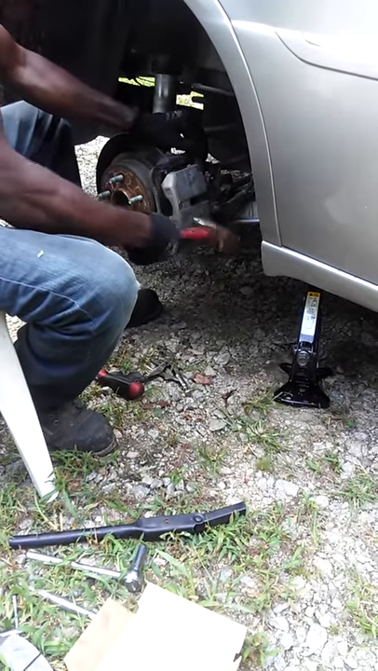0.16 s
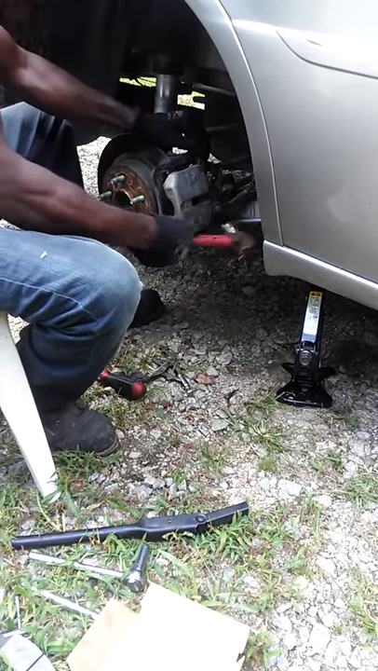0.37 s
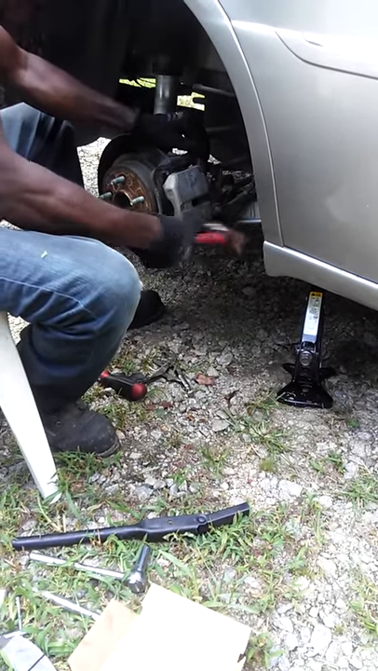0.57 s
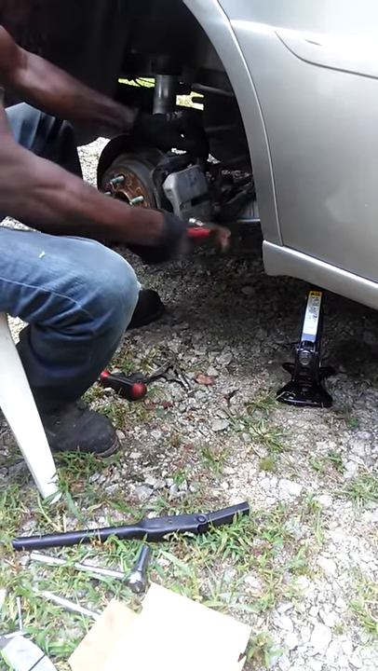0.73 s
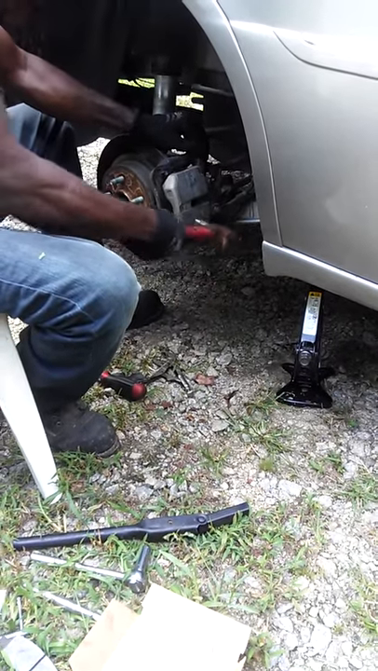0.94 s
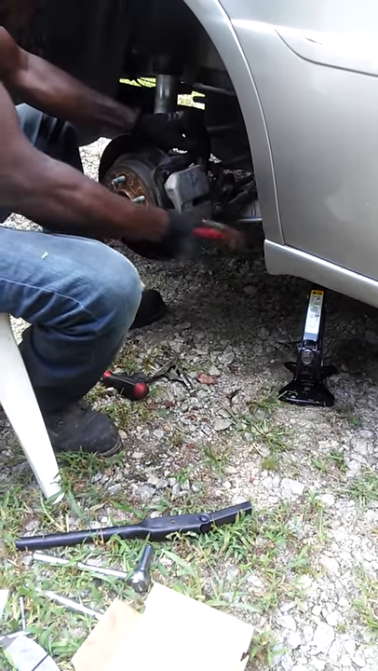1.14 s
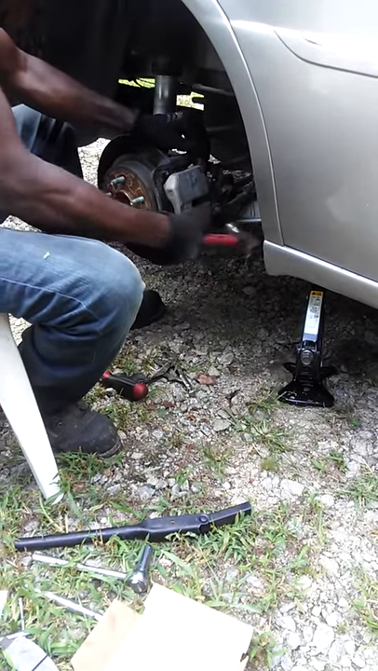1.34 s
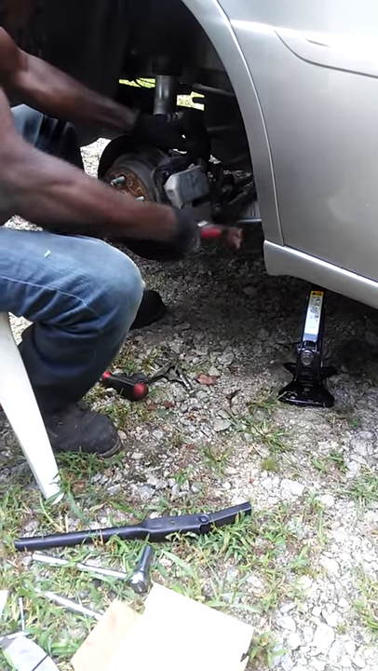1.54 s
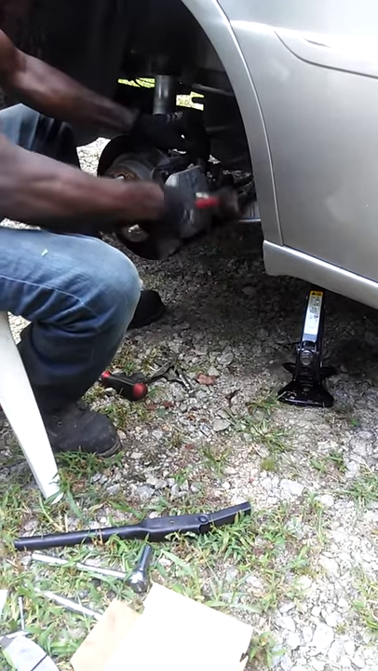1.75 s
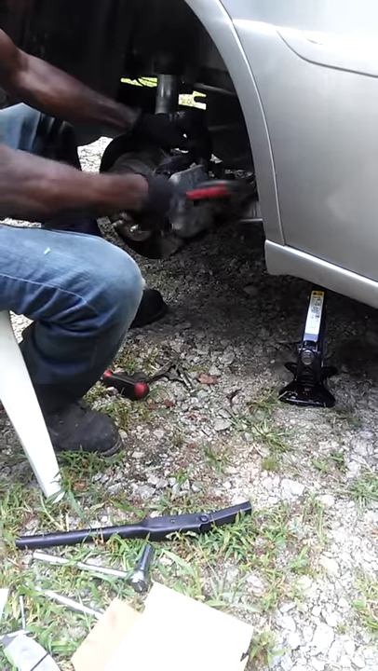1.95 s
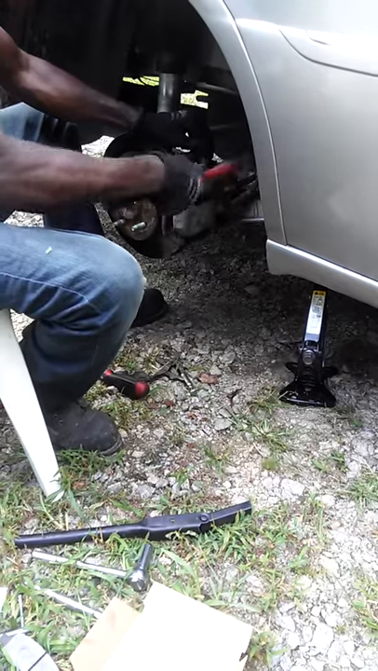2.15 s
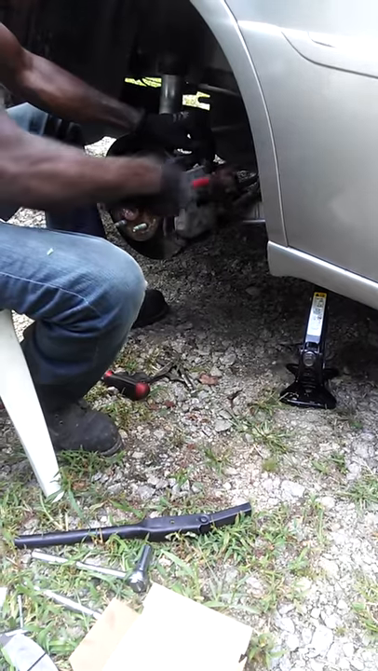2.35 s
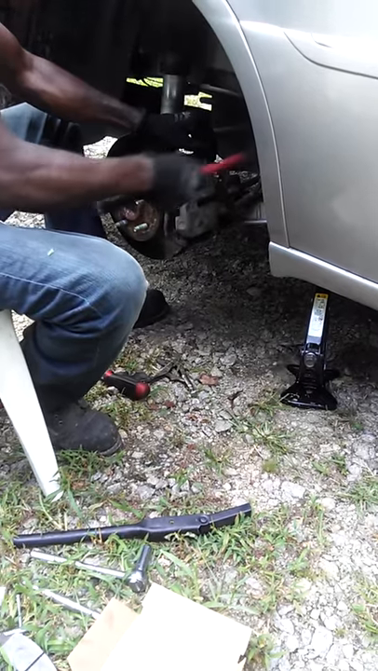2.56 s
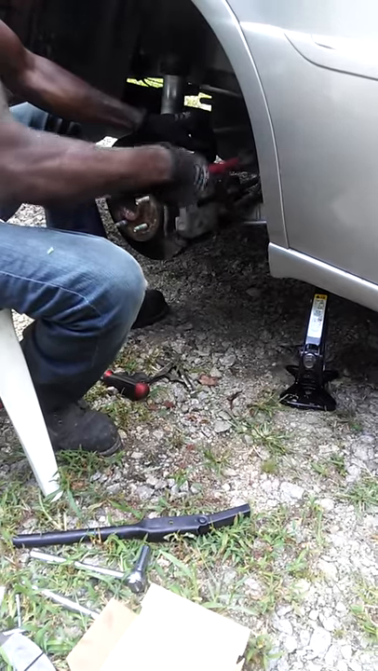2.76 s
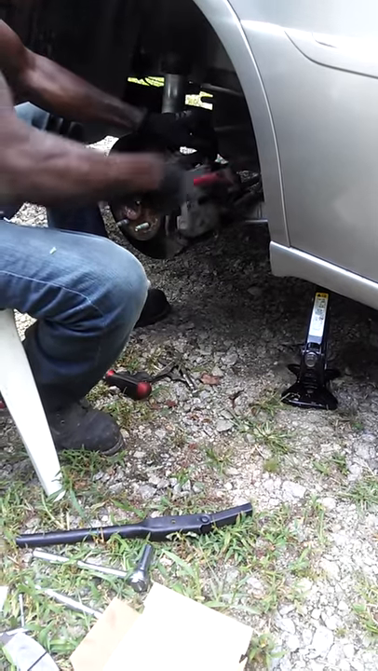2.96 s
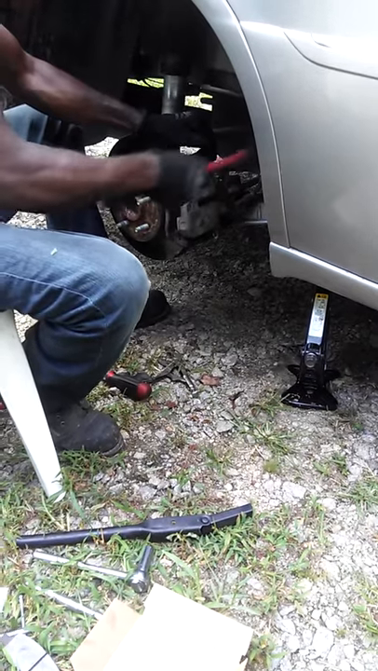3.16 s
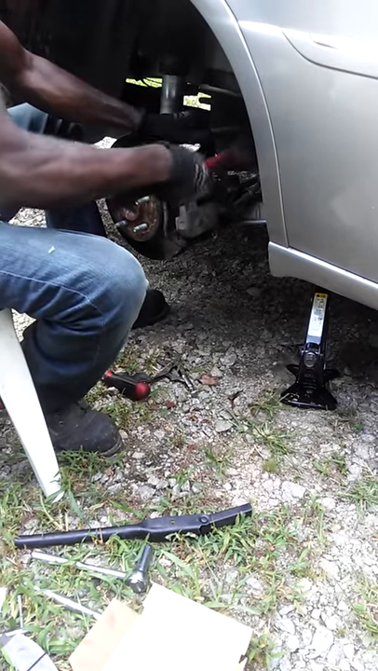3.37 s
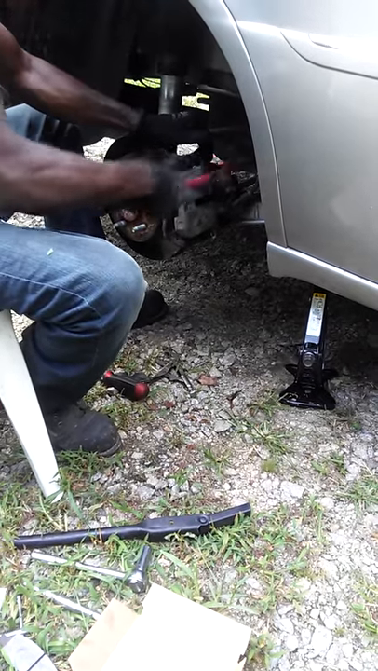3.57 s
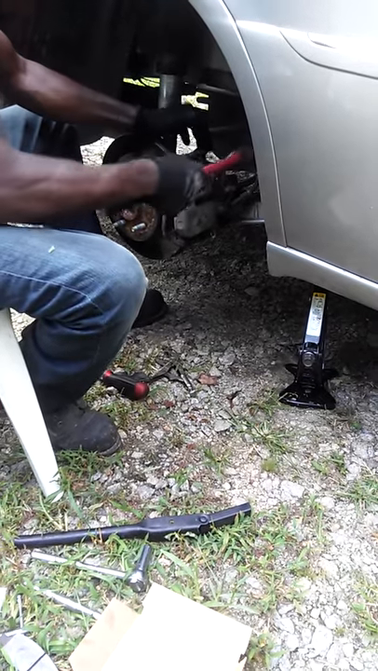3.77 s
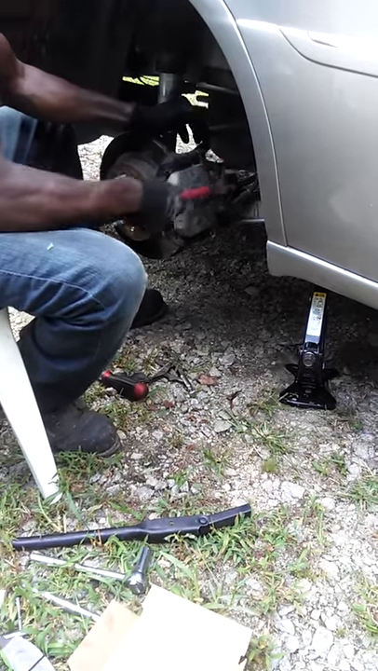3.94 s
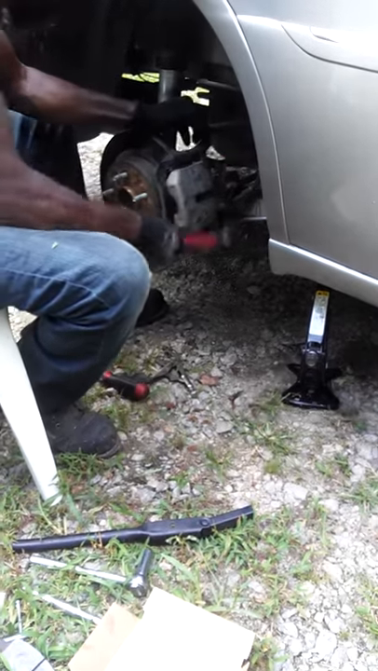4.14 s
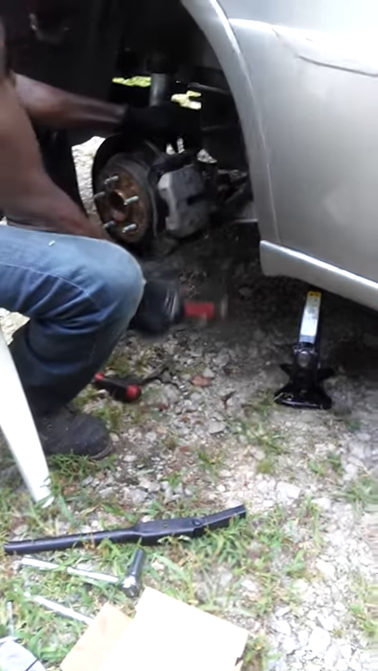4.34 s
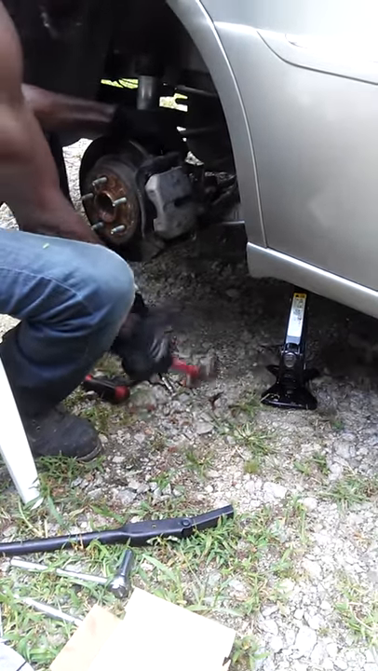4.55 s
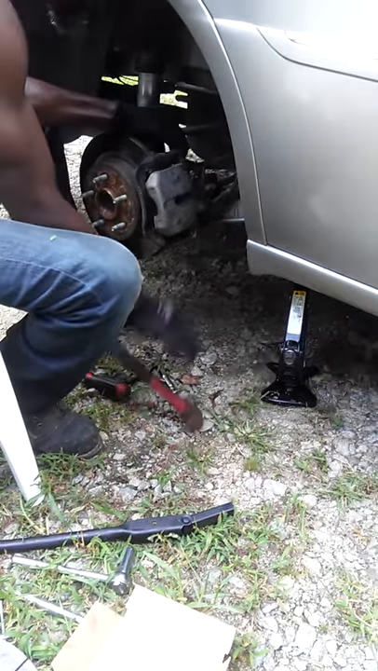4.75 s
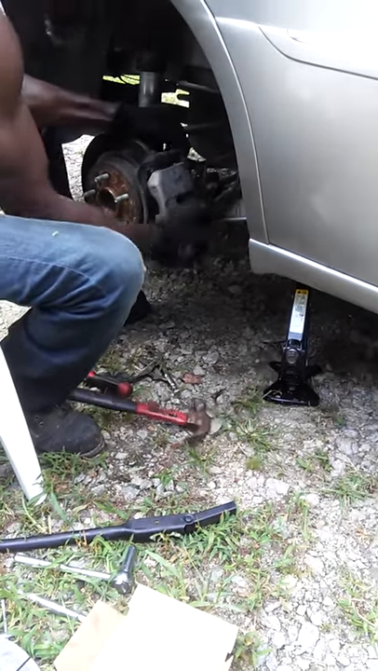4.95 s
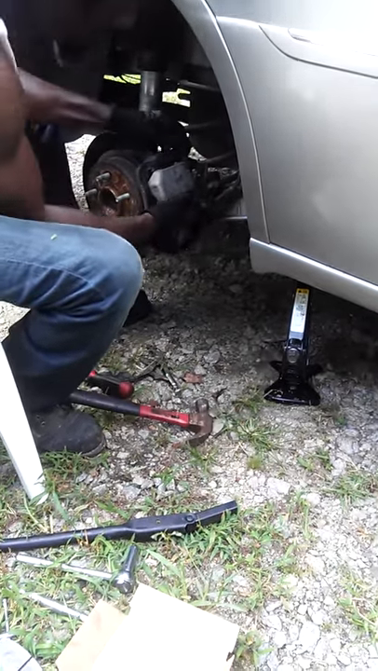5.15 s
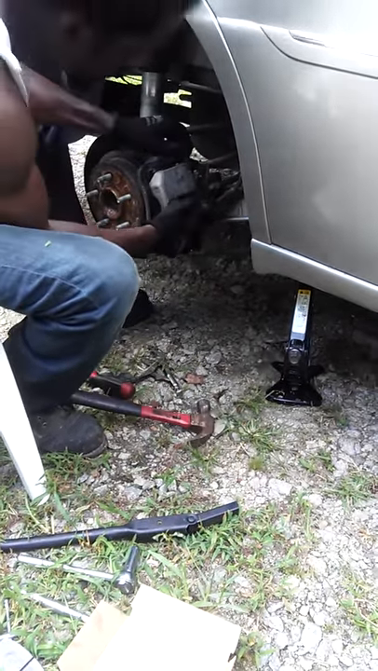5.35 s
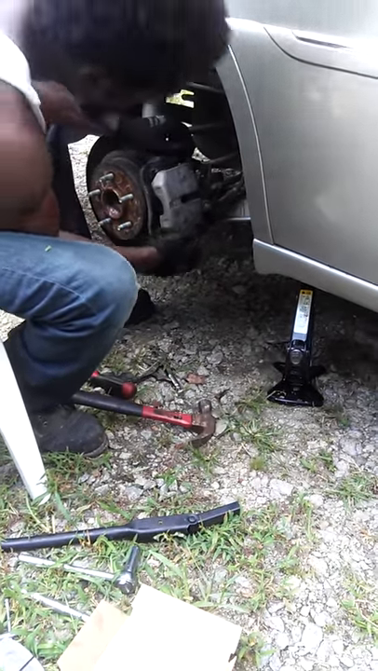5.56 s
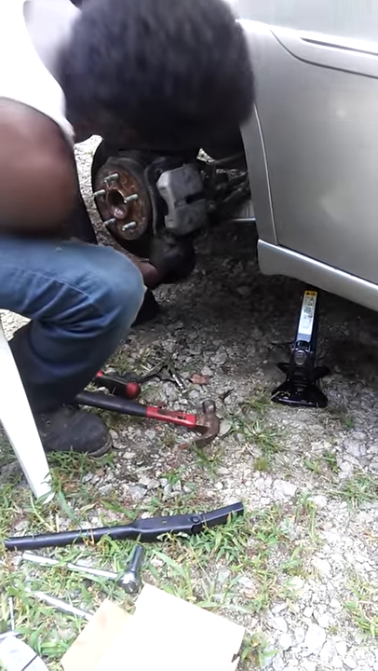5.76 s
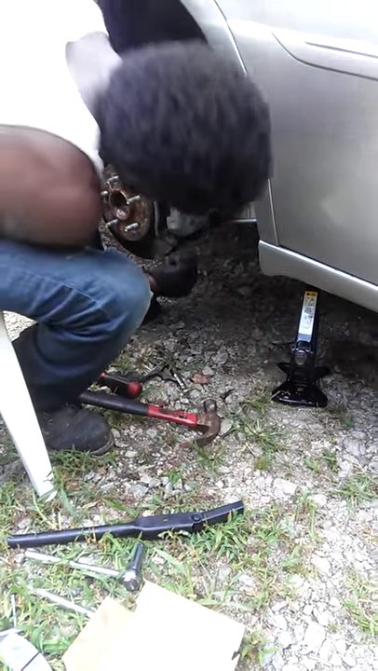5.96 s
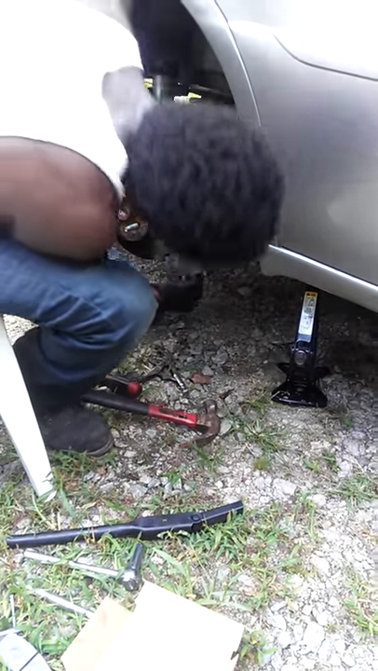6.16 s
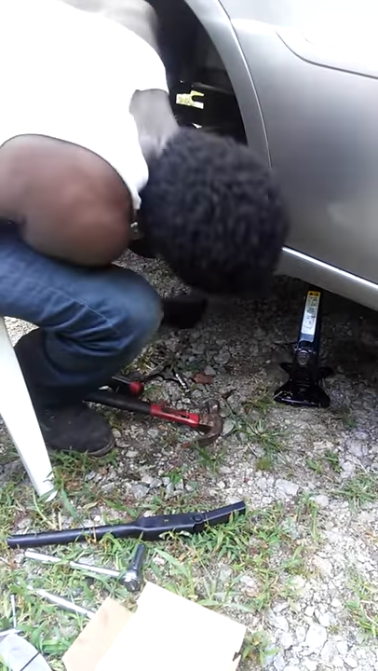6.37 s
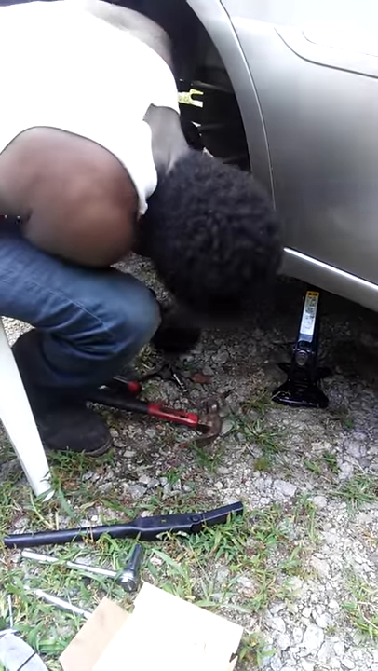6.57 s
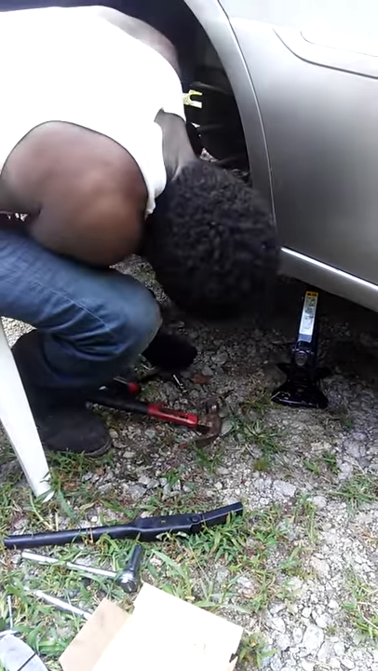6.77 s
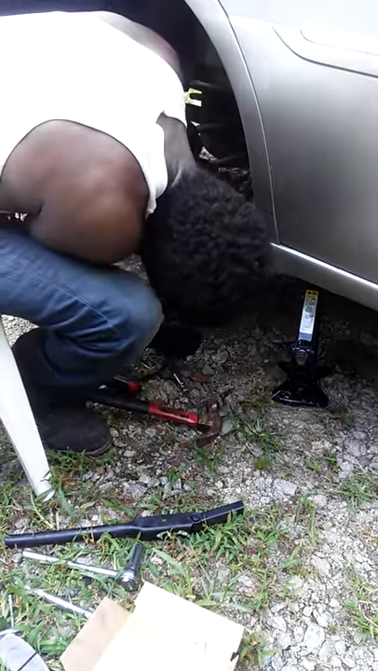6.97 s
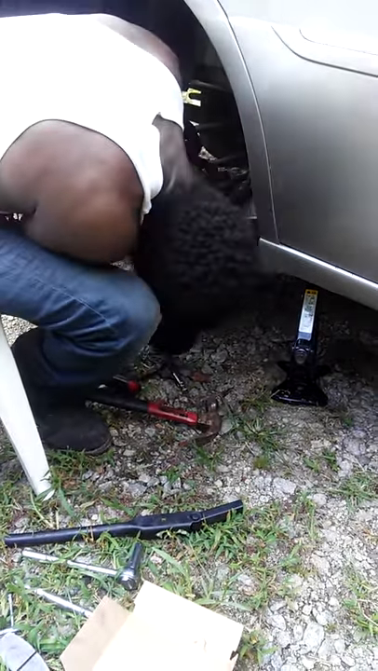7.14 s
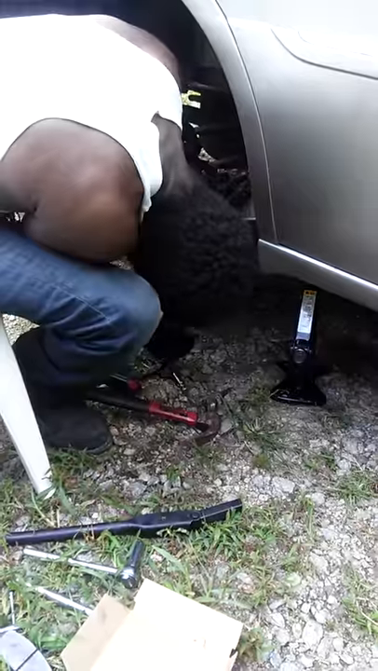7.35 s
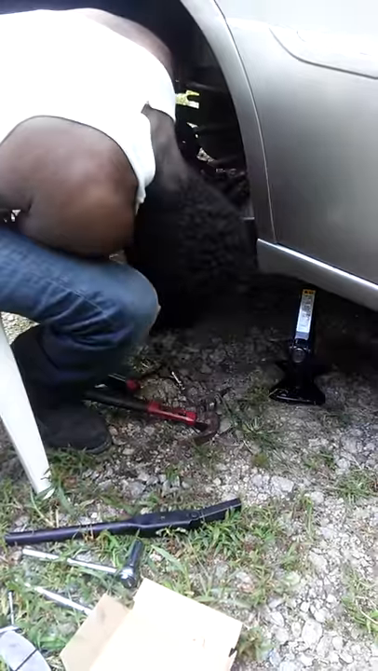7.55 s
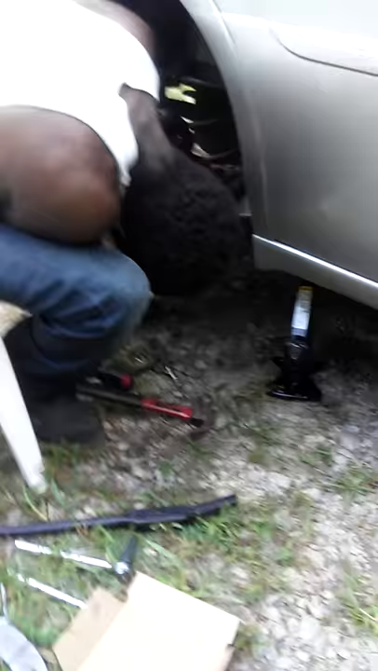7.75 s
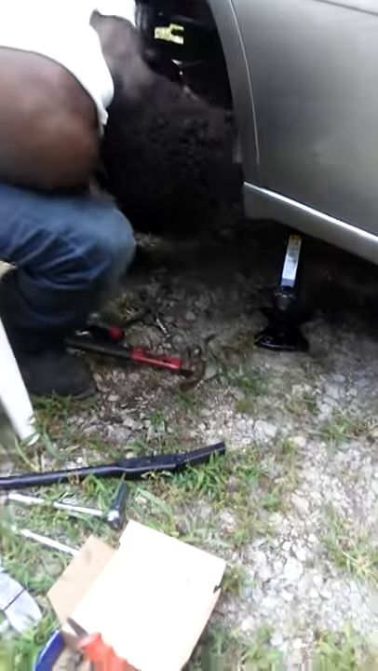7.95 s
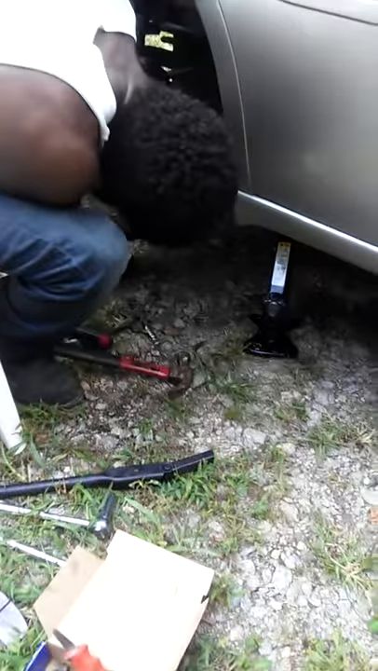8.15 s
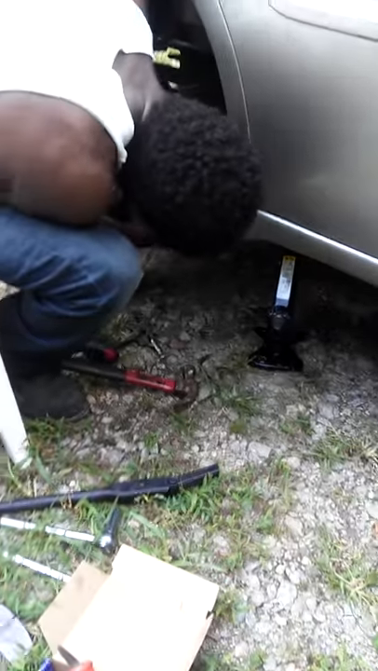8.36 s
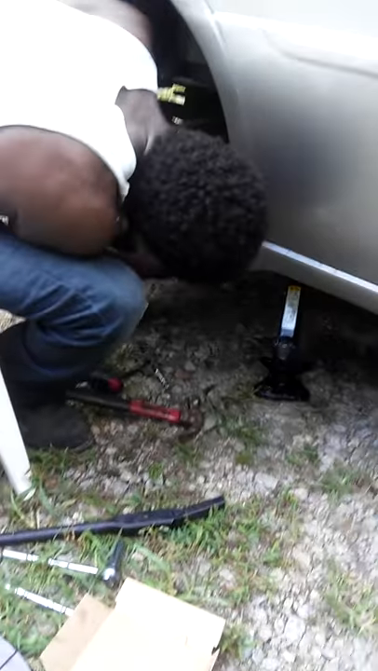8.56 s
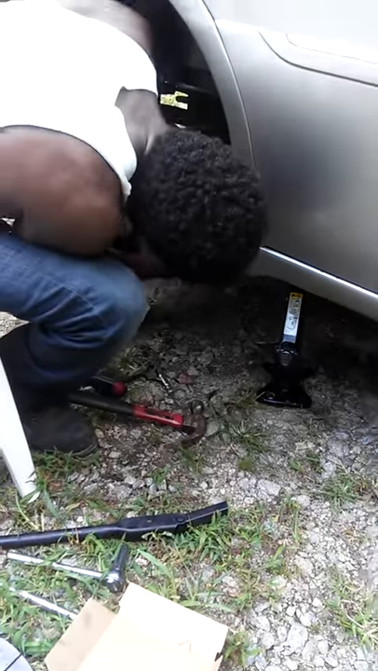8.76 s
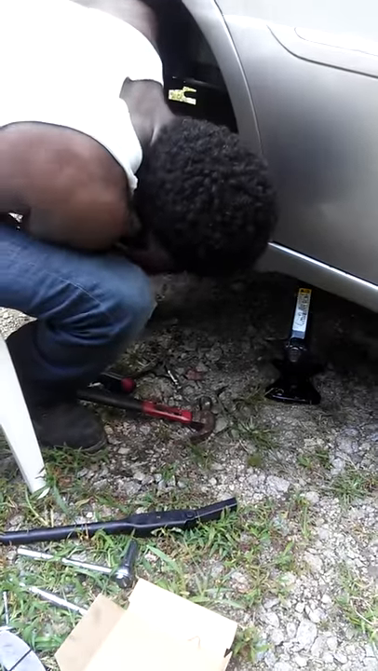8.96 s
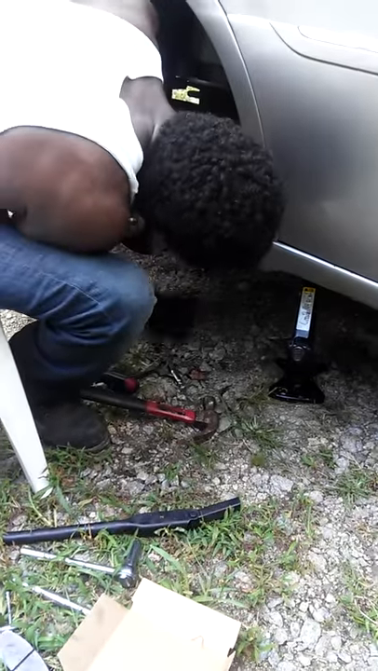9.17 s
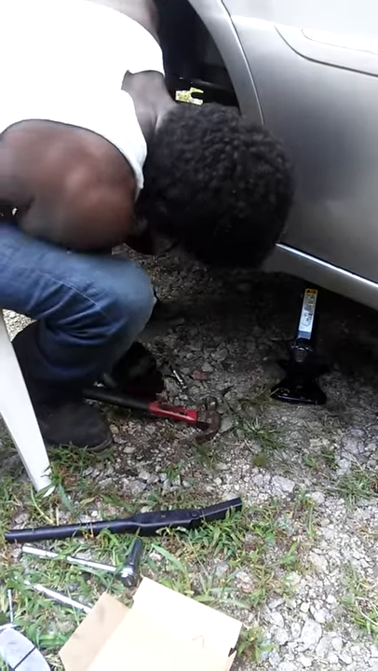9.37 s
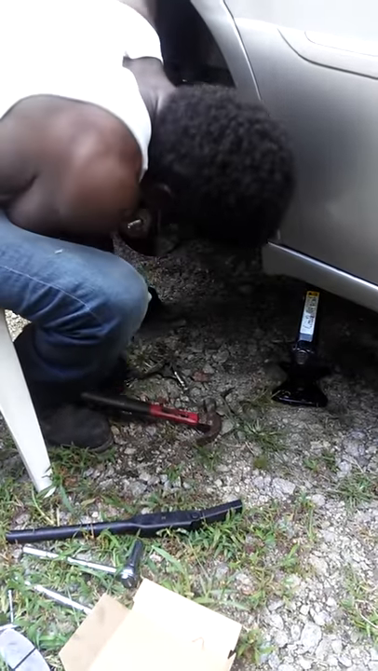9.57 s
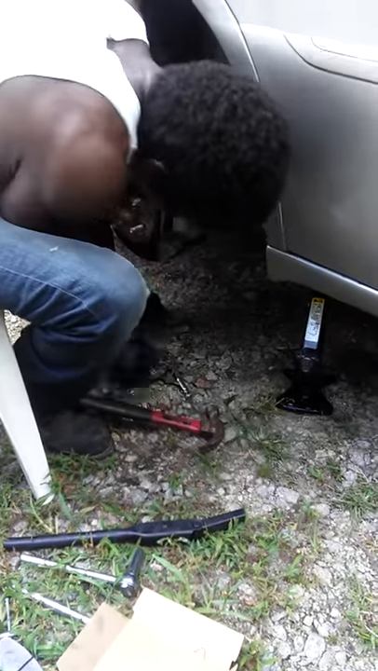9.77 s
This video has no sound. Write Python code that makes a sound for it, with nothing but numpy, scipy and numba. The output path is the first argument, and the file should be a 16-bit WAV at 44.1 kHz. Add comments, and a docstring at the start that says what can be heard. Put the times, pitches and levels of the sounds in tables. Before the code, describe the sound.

A close outdoor microphone, overloaded by loud blows. From 0 to 1.45 s a hammer hits a car's brake caliper roughly every quarter second: the tail of one blow, then six hard, dense clangs with a low thump, a whistling ring near 6 kHz and a short open-yard echo, the level pumping and clipping. After a half-second gap, six more blows from 2.03 to 3.56 s come every 0.3 s, brighter and higher, mostly with less thump. The ring fades by about 4.3 s. At 4.64 s the hammer drops on gravel, clacks again around 4.8 s, and slides and settles by 5.1 s with gritty crunching. Afterwards it is quiet: a buzzy cicada swells near 4.95, 6.1, 7.3, 8.55 and 9.8 s over a thin high insect chorus, soft air and low rumble. A soft wind puff comes at 8.87 s; small steel ticks, scrapes and faint gravel grinding follow from 9.1 to 9.8 s.

```python
"""Two runs of hammer blows clang on a car's brake caliper outdoors, then the hammer drops on gravel.
Each blow is a burst of dense damped modes plus ringing brake, claw and body shell modes and a yard echo.
Gravel grinds and small steel parts tick and scrape: filtered grains, noise bursts and short resonances.
A cicada swells over a far insect chorus, soft air, low rumble and faint chirps: shaped noise.
Loud sound turns a gain control down, which ducks the start of the echo; what still overloads is clipped."""
import sys
import numpy as np
from scipy import signal
from scipy.fft import rfft, irfft, next_fast_len
from scipy.io import wavfile
from scipy.ndimage import uniform_filter1d, minimum_filter1d, map_coordinates
from numba import njit

SR = 44100
rng = np.random.default_rng(int(sys.argv[2]) if len(sys.argv) > 2 else 0)


def wav_record(signal):
    """Record a signal, one row per channel, as 16-bit PCM in the file named by sys.argv[1]."""
    frames = np.transpose(np.atleast_2d(signal))
    bounded = np.clip(frames, -1, 1)
    # unit amplitude maps onto the largest positive 16-bit level
    quanta = np.round(bounded * 32767).astype(np.int16)
    wavfile.write(sys.argv[1], SR, quanta)


N = 432621

# yard echo colour: (frequency [Hz], relative level [dB])
YARD_COLOUR = [(60, -11.5), (400, -23), (900, -12), (2000, -1), (5000, 8.5), (8000, 8), (11000, 0),
               (16000, 3.5)]
# yard echo decay: (frequency [Hz], t60 [s])
YARD_DECAY = [(100, 0.98), (1000, 0.96), (4000, 0.51), (8000, 0.49), (14000, 0.53)]


def amp(db):
    """Decibels to gain."""
    return 10 ** (np.asarray(db) / 20)


def unit(x):
    """Scale to rms 1."""
    return x / np.sqrt(np.mean(x ** 2) + 1e-20)


def along(points, hz):
    """(Hz, value) points interpolated on a log frequency axis."""
    point_hz, values = np.transpose(points)
    return np.interp(np.log(hz + 1), np.log(point_hz + 1), values)


def clock(size=N):
    """Time of each sample in seconds."""
    return np.arange(size) / SR


def wobble(rate_hz):
    """Smooth random curve with rate_hz knots a second."""
    knots = rng.standard_normal(int(N * rate_hz / SR) + 4)
    return map_coordinates(knots, [clock() * rate_hz])


def coloured(x, spectrum):
    """x filtered by a (Hz, dB) spectrum, at rms 1."""
    padded = next_fast_len(len(x) + 4096)
    gain = amp(along(spectrum, np.fft.rfftfreq(padded, 1 / SR)))
    return unit(irfft(rfft(x, padded) * gain, padded)[:len(x)])


def noise(spectrum, size=N):
    """Coloured noise of rms 1."""
    return coloured(rng.standard_normal(size), spectrum)


def fade(t, t60_s):
    """Exponential decay: 60 dB down after t60_s."""
    return np.exp(-np.log(1000) * t / t60_s)


def dying(spectrum, t60s):
    """One second of dense random modes as noise whose bands fade at their own speeds."""
    hz, t, bands = signal.stft(noise(spectrum, size=SR), SR, nperseg=256)
    bands = bands * fade(t, along(t60s, hz)[:, None])
    return signal.istft(bands, SR, nperseg=256)[1][:SR]


def ring(hz, db, t60_s, drift_hz=4):
    """One second of a single decaying mode, db rms at the start; loose contacts make its pitch drift."""
    t = clock(size=SR)
    drift = drift_hz * np.interp(t, np.linspace(0, 1, 40), rng.standard_normal(40))
    cycles = np.cumsum(hz + drift) / SR + rng.random()
    return np.sqrt(2) * amp(db) * fade(t, t60_s) * np.sin(2 * np.pi * cycles)


def grains(per_s, spectrum):
    """Tiny coloured clicks of very uneven size at random times, at rms 1."""
    clicks = (rng.random(N) < per_s / SR) * rng.standard_normal(N)
    return coloured(clicks, spectrum)


def strokes(rows, attack_s, release_t60_s):
    """Gain of sliding contacts: each rises up to its start, holds for its length and dies away."""
    t, gain = clock(), np.zeros(N)
    for start_s, length_s, db in rows:
        attack = np.clip(1 + (t - start_s) / attack_s, 0, 1)
        release = fade(np.maximum(t - start_s - length_s, 0), release_t60_s)
        gain += amp(db) * attack * release
    return gain


def bell(peak_s, width_s):
    """Gaussian rise and fall that peaks at 1 at peak_s."""
    return np.exp(-.5 * ((clock() - peak_s) / width_s) ** 2)


def add(track, s, sound):
    """Mix a sound into the track from time s, cut at the track's ends."""
    start = round(s * SR)
    sound = sound[max(-start, 0):N - start]
    track[max(start, 0):][:len(sound)] += sound


def yard_response(onset_s=0):
    """The yard's answer: noise of unit energy whose bands die at their own speeds, with a soft onset."""
    yard = dying(YARD_COLOUR, YARD_DECAY)
    if onset_s:
        yard = yard * (1 - np.exp(-clock(size=SR) / onset_s))
    return yard / np.linalg.norm(yard)


def claw_ring(spot, level_db, note_hz=5900, t60_s=0.67, turned_db=-17, turn_fade_s=0.03):
    """Two close claw prong modes beat; their level drops as the backswing turns the claw away."""
    # turn start after a blow struck (low [s], high [s])
    turn_s = (.1, .152)
    facing_db, facing_lead_s, facing_width_s = 3.5, .03, 0.021
    low_prong = ring(note_hz, level_db, t60_s, drift_hz=13)
    high_prong = ring(note_hz + 13, level_db - 23.5, t60_s, drift_hz=9)
    swing_s = clock(size=SR) - turn_s[spot]
    # just before it turns away the claw faces the microphone and its note swells
    facing = facing_db * np.exp(-.5 * ((swing_s + facing_lead_s) / facing_width_s) ** 2)
    turning = turned_db * np.clip(swing_s / turn_fade_s, 0, 1)
    return (low_prong + high_prong) * amp(facing + turning)


def brake_ring(spot, clang_db, scatter_db):
    """Lasting disc and caliper modes, excited differently at each struck spot."""
    # (frequency [Hz], struck low [dB, relative], struck high [dB, relative], t60 [s])
    brake_modes = [(303, -20, -30.5, 0.23), (339.4, -23.5, -10, 0.31), (385, -21.5, -18, .19),
                   (478, -16, -18, 0.3), (515, -33.5, -17.5, 0.28), (684, -20.5, -15, 0.29),
                   (835, -14, -7, .29), (1208, -16, -16, .43), (2783, -13, -4, .22), (4470, -32, -30, .33),
                   (1236, -31.5, -33, 0.48), (1550.6, -7.5, -13, 0.093), (1783, -27, -29, 0.7),
                   (1830, -31.5, -40.5, 0.43), (2160, -11, -10, 0.2), (3110, -11, -2.5, 0.16),
                   (3440, -11, -14, 0.1), (4200, -24.5, -30.5, 0.22), (5740, -20.5, -0.5, 0.048),
                   (6920, -14.5, -15.5, 0.27), (7450, -4.5, -25.5, 0.087), (8740, -1.5, -23.5, .06)]
    brake_db, out = -12, np.zeros(SR)  # dB relative to the clang
    for hz, *levels_db, t60_s in brake_modes:
        # well damped modes depend on loose contacts, so they shift most from blow to blow
        shifted_hz = hz * (1 + rng.normal(0, 0.00092) / t60_s)
        level_db = clang_db + brake_db + levels_db[spot] + rng.normal(0, scatter_db)
        out += ring(shifted_hz, level_db, t60_s, drift_hz=0.93)
    return out


def body_jolt(clang_db, thump_db, scatter_db, thump_hz=58, thump_t60_s=0.24, onset_s=0.0017):
    """A low thump and the modes of suspension and body shell, with a soft onset."""
    # (frequency [Hz], relative level [dB], t60 [s])
    shell_modes = [(51.65, -25.5, 0.67), (62, -28, 1), (82.3, -27, 0.88), (100, -16.5, 0.11),
                   (124.2, -20.5, 0.62), (167.6, -20.5, .45), (214, -18, 0.31)]
    shell_db = -6.5  # relative to the clang
    out = ring(thump_hz, thump_db, thump_t60_s, drift_hz=4)
    for hz, db, t60_s in shell_modes:
        level_db = clang_db + shell_db + db + rng.normal(0, scatter_db)
        out += ring(hz, level_db, t60_s, drift_hz=6.2)
    return out * (1 - np.exp(-clock(size=SR) / onset_s))


def hammering(fresh=0.59, scatter_db=2.5, echo_db=-18):
    """Steel on steel: dense damped modes clang, lasting modes ring, the body jolts and the yard answers."""
    # (time [s], spot [0 low / 1 high], clang level [dB], thump level [dB], claw level [dB])
    blows = [(-0.045, 0, -3.5, -17, -28.5), (0.204, 0, 6, -2.5, -15), (0.457, 0, 6, -5.5, -19.5),
             (0.7048, 0, 6.5, -0.5, -14.5), (0.9653, 0, 7, 2, -8), (1.2115, 0, 6.5, 3, -7),
             (1.453, 0, 7, 2.5, -9), (2.0302, 1, 4, -14, -11), (2.3439, 1, 7, 1, -10.5),
             (2.6545, 1, 7, -17, -8), (2.955, 1, 7.5, -18, -5.5), (3.2579, 1, 9.5, -4.5, -5),
             (3.5573, 1, 8.5, -17, -6.5)]
    # caliper's dense modes, struck low and high: (frequency [Hz], relative level [dB per Hz])
    clang_low = [(40, -19), (150, 1), (500, -14), (1100, -13.5), (1800, -6.5), (2900, -0.5), (4500, -1.5),
                 (5800, -2), (6300, -10), (7600, -4.5), (9200, -7), (11000, -19.5), (16000, -31.5)]
    clang_high = [(40, -16.5), (200, -4.5), (500, -11), (1100, -8), (1800, -5), (2900, -0.5), (4500, -1),
                  (5850, 0.5), (6200, -9), (7600, -7), (9200, -5.5), (11000, -16.5), (16000, -32.5)]
    # clang decay: (frequency [Hz], t60 [s])
    clang_decay = [(150, 0.32), (500, 0.27), (1500, 0.18), (3500, 0.099), (8000, 0.059), (14000, 0.13)]
    out, spectra = np.zeros(N), (clang_low, clang_high)
    spot_clangs = [dying(spectrum, clang_decay) for spectrum in spectra]
    for s, spot, clang_db, thump_db, claw_db in blows:
        spot = int(spot > .5)
        # each spot has its own clang; a fresh share (of power) makes the blows differ
        fresh_clang = dying(spectra[spot], clang_decay)
        clang = np.sqrt(1 - fresh) * spot_clangs[spot] + np.sqrt(fresh) * fresh_clang
        clang = amp(clang_db) * clang
        modes = brake_ring(spot, clang_db, scatter_db)
        claw = claw_ring(spot, claw_db)
        jolt = body_jolt(clang_db, thump_db, scatter_db)
        # mostly the broad clang carries to the walls and trees
        carried = clang + 0.28 * (modes + claw)
        echo = signal.fftconvolve(carried, yard_response(onset_s=0.0063))[:SR]
        add(out, s, clang + modes + claw + jolt + amp(echo_db) * echo)
    return out


def insects(chorus_db=-55.0, tymbal_hz=230, buzz=0.15, swell_width_s=.155):
    """A cicada's noise, modulated at its tymbal rate, swells and sinks over a steady high chorus."""
    # cicada swells: (time [s], level [dB])
    swells = [(3.95, -47), (4.95, -51.5), (6.11, -49.5), (7.331, -49), (8.56, -48), (9.78, -49)]
    # near cicada: (frequency [Hz], relative level [dB per Hz])
    cicada = [(3000, -51.5), (3650, -23), (3900, -1), (4700, -4), (5500, 6.5), (6200, -4), (7200, -3),
              (9000, -8), (11000, -23), (16000, -30.5)]
    # far insects: (frequency [Hz], relative level [dB per Hz])
    chorus = [(5000, -44.5), (7000, -31.5), (7700, -4.5), (8200, 2), (8600, -3), (9200, -16),
              (11000, -24.5), (16000, -50.5)]
    swell = sum(amp(db) * bell(s, swell_width_s) for s, db in swells)
    rate_hz = tymbal_hz * (1 + 0.087 * wobble(24))
    tymbal = 1 + buzz * np.sin(2 * np.pi * np.cumsum(rate_hz) / SR)
    near = swell * tymbal * noise(cicada)
    far = amp(chorus_db + .5 * wobble(12)) * noise(chorus)
    return near + far


def outdoors(air_db=-61, rumble_db=-55, rumble_waver_db=1.8):
    """Wavering low rumble with one soft puff, soft air and faint far chirps, all shaped noise."""
    # (frequency [Hz], relative level [dB per Hz])
    rumble = [(20, -27.5), (40, -4.5), (60, 5), (90, -7.5), (120, -1.5), (170, -16.5), (300, -32),
              (800, -56.5)]
    # (frequency [Hz], relative level [dB per Hz])
    air = [(100, -11.5), (200, 0), (300, -2), (450, -3), (600, -8.5), (1100, -13.5), (2000, -15.5),
           (4000, -15), (7000, -15), (11000, -21.5), (15800, -24.5)]
    # far chirps: (time [s], frequency [Hz], level [dB])
    chirps = [(3.961, 1130, -56.5), (5.351, 5360, -56), (6.75, 1050, -58.5)]
    puff_s, puff_db, puff_width_s = 8.865, -48, 0.038
    breeze = amp(rumble_db + rumble_waver_db * wobble(4.2)) + amp(puff_db) * bell(puff_s, puff_width_s)
    out = breeze * noise(rumble) + amp(air_db + .7 * wobble(4.3)) * noise(air)
    swell = np.hanning(SR // 16)
    for s, hz, db in chirps:
        tone = noise([(hz / 2, -90), (hz, 0), (hz * 2, -90)], size=len(swell))
        add(out, s - len(swell) / SR / 2, amp(db) * swell * tone)
    return out


def dropped_hammer(clack_db=-4, clack_t60_s=0.045, claw_db=-45, thud_t60_s=0.11, uneven_db=5, echo_db=-23):
    """Head and handle clack on the stones, thud on the soil beneath and slide to rest, with an echo."""
    # landing and settling: (time [s], part [0 head / 1 handle], relative level [dB], tilt [dB per octave])
    impacts = [(4.638, 0, -10, 6), (4.671, 0, -27, 4), (4.792, 0, -12, -2), (4.8, 0, -13, -1),
               (4.826, 0, -17.5, 1), (4.852, 0, -17, 2.5), (4.922, 0, -27, 0.5), (4.965, 1, -23, -2),
               (4.975, 1, -32, -5.5), (5.058, 0, -33.5, 0)]
    # clack: (frequency [Hz], relative level [dB per Hz])
    stones = [(200, -20), (500, -18), (1000, -12), (1750, -4), (2700, 1.5), (4000, 1.5), (6000, 1.5),
              (9000, 2), (12000, -5), (16000, -16)]
    # soil: (frequency [Hz], relative level [dB per Hz])
    soil = [(60, -39), (150, -7.5), (270, 6), (430, -12), (800, -14.5), (3000, -30)]
    # thud level within an impact (head [dB], handle [dB])
    thud_db = (-25, -8.5)
    # handle slides to rest: (start [s], length [s], level [dB])
    drag = [(4.925, 0.057, -39.5)]
    # sliding handle: (frequency [Hz], relative level [dB per Hz])
    handle = [(100, -10.5), (250, 15), (600, -1), (1200, -7), (2800, -2), (6000, -4), (10000, -6),
              (16000, -23.5)]
    out = strokes(drag, attack_s=0.0055, release_t60_s=0.1) * grains(2100, handle)
    t, bands_hz = clock(size=SR), np.geomspace(200, 16000, 48)
    onset = 1 - np.exp(-t / 0.0021)
    for s, part, db, tilt in impacts:
        # every impact has its own uneven colour
        stone_db = along(stones, bands_hz) + tilt * np.log2(bands_hz / bands_hz[0])
        stone_db = stone_db + rng.normal(0, uneven_db, len(bands_hz))
        clack = amp(clack_db) * noise(np.c_[bands_hz, stone_db], size=SR) * fade(t, clack_t60_s)
        thud = amp(thud_db[int(part > .5)]) * noise(soil, size=SR) * fade(t, thud_t60_s)
        claw = ring(5900, claw_db, 1.0)
        add(out, s, amp(db) * ((clack + thud) * onset + claw))
    return out + amp(echo_db) * signal.fftconvolve(out, yard_response())[:N]


def gravel(grit_db=4):
    """Small stones grind as dense random clicks, under the hammer and then under a boot."""
    # (start [s], length [s], relative level [dB])
    grit = [(4.68, 0.34, -59), (9.33, 0.43, -65)]
    # small stones: (frequency [Hz], relative level [dB per Hz])
    stone_colour = [(150, -14), (400, 8), (1500, -8), (2600, 1), (5000, -1), (9000, 1), (12000, -4),
                    (16000, -11)]
    return amp(grit_db) * strokes(grit, attack_s=.03, release_t60_s=0.65) * grains(900, stone_colour)


def handling(body_db=-7, note_db=-12, ping_hz=8700, tick_cycles=180):
    """Loose steel parts tick, each with a short main resonance and a high ping, and scrape on the bracket."""
    # (time [s], relative level [dB], main resonance [Hz], relative ping level [dB])
    ticks = [(8.525, -47, 2180, -30), (9.095, -31, 2480, -19), (9.29, -45.5, 4140, -30),
             (9.337, -36, 3750, -28), (9.359, -41, 5130, -15), (9.375, -31.5, 5200, -28),
             (9.526, -30, 3870, -4), (9.616, -36, 4830, -7), (9.761, -39, 3630, -23)]
    # scrapes: (start [s], length [s], level [dB])
    rub = [(9.365, 0.091, -59), (9.52, .12, -54.5)]
    # scraped bracket: (frequency [Hz], relative level [dB per Hz])
    bracket = [(600, -14), (1000, 1.5), (1200, -3), (1600, -32), (2000, -18), (2300, 4.5), (2800, -17),
               (5000, -13)]
    out = strokes(rub, attack_s=0.013, release_t60_s=.3) * grains(505.2, bracket)
    t = clock(size=SR)
    ping_colour = [(6000, -40), (ping_hz, 0), (11000, -14), (16000, -20)]
    for s, db, hz, ping_db in ticks:
        t60_s = tick_cycles / hz  # small high parts ring shortest
        body_colour = [(200, -18), (hz / 2, -11), (hz, 0), (hz * 2.0, -15), (20000, -32)]
        body = amp(body_db) * noise(body_colour, size=SR)
        ping = amp(ping_db) * noise(ping_colour, size=SR)
        add(out, s, amp(db) * ((body + ping) * fade(t, t60_s) + ring(hz, note_db, t60_s)))
    return out


def scene():
    """Sum of all sources at the one microphone."""
    return (hammering() + insects() + outdoors() + dropped_hammer() + gravel() + handling())[None]


@njit
def follow(wanted, attack, release):
    """One-pole gain in dB with separate fall and recovery time constants, in samples."""
    out, now = np.zeros(len(wanted)), 0.
    for i in range(len(wanted)):
        now += (wanted[i] - now) / (attack if wanted[i] < now else release)
        out[i] = now
    return out


def gain_control(x, threshold_db=-11, depth_db=13, attack_s=0.02, release_s=0.028, hold_s=.07):
    """Level above the threshold turns the gain down; it holds, then comes back."""
    level_db = 10 * np.log10(np.abs(uniform_filter1d(x ** 2, 128)) + 1e-12)
    wanted_db = -np.clip(level_db - threshold_db, 0, depth_db)
    half = int(hold_s * SR / 2)
    held_db = minimum_filter1d(wanted_db, 2 * half + 1, origin=half)  # looks back over the hold
    return x * amp(follow(held_db, attack_s * SR, release_s * SR))


def record(dry, low_cut_hz=32, top_hz=15700):
    """Microphone low cut, gain control, hard clipping at full scale and a steep band limit."""
    low_cut = signal.butter(2, low_cut_hz, "high", fs=SR, output="sos")
    heard = signal.sosfilt(low_cut, dry[0])
    clipped = np.clip(gain_control(heard), -1, 1)
    band_limit = signal.cheby1(14, .05, top_hz, fs=SR, output="sos")
    return signal.sosfilt(band_limit, clipped)[None]


dry = scene()
out = record(dry)
wav_record(out)
```